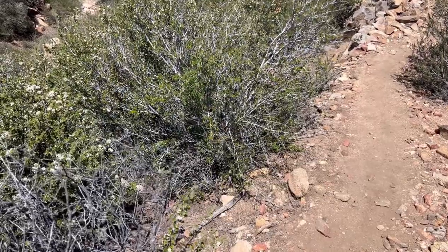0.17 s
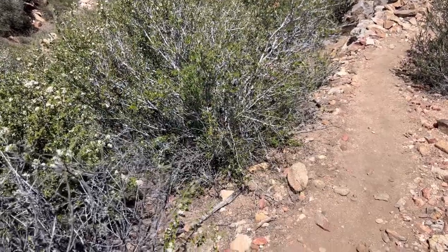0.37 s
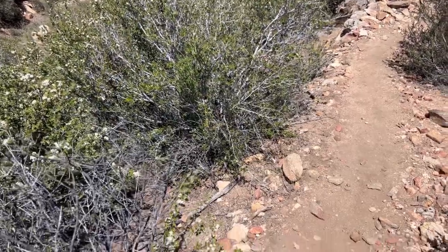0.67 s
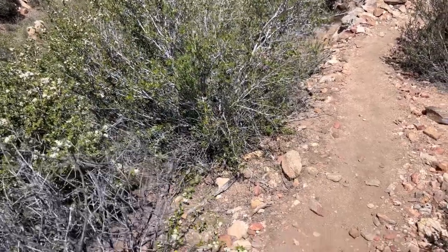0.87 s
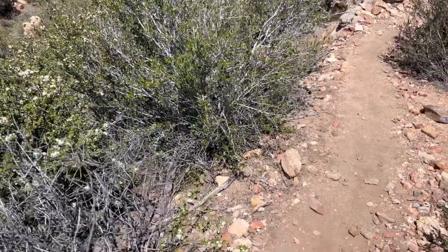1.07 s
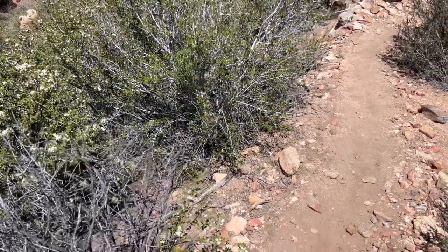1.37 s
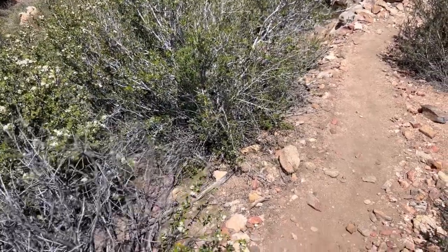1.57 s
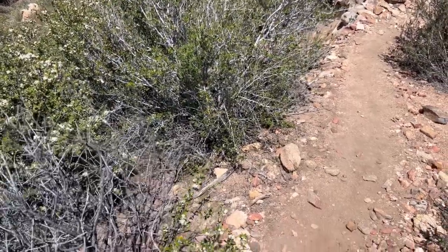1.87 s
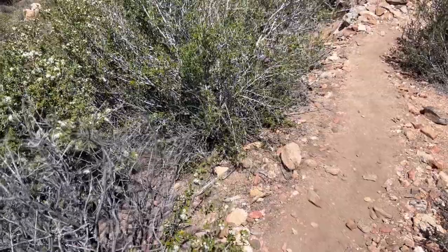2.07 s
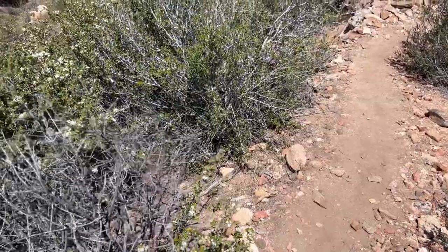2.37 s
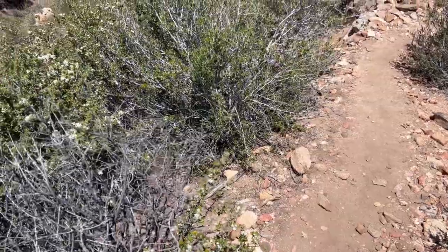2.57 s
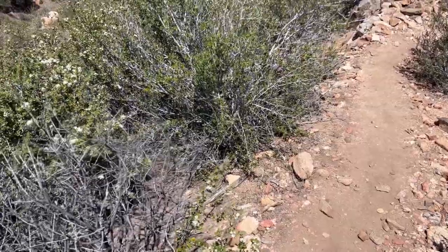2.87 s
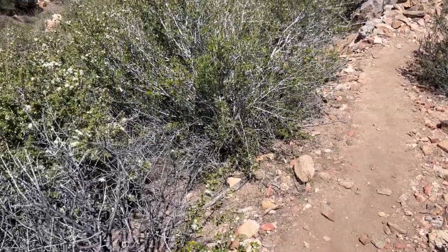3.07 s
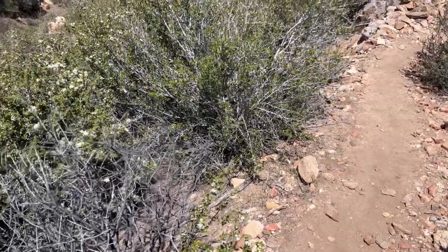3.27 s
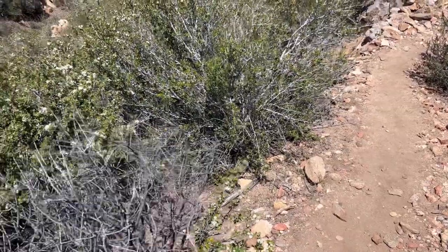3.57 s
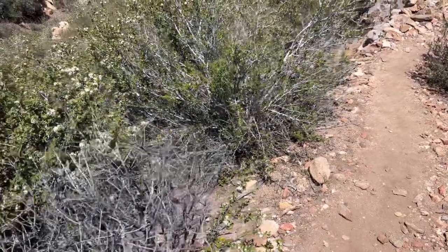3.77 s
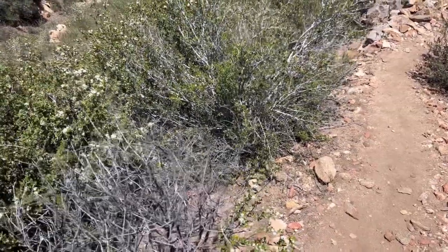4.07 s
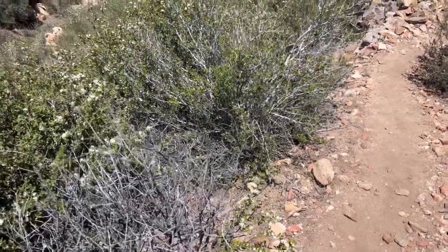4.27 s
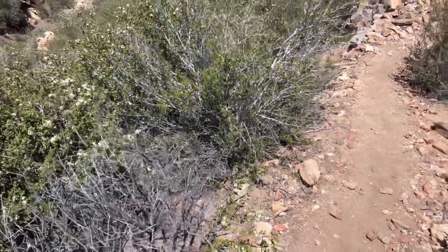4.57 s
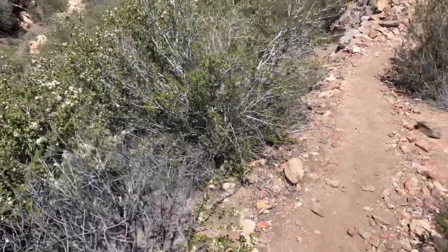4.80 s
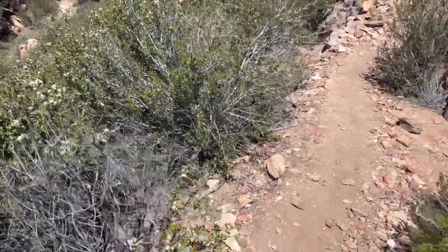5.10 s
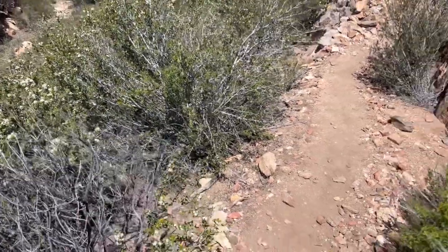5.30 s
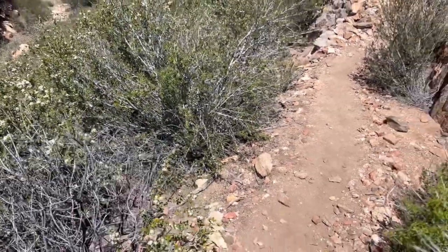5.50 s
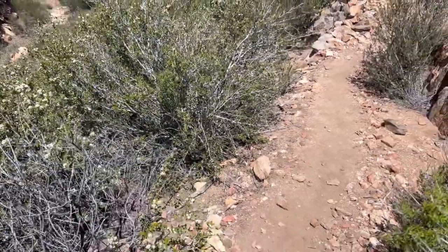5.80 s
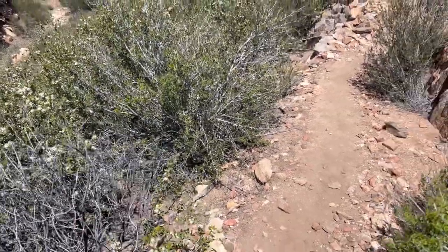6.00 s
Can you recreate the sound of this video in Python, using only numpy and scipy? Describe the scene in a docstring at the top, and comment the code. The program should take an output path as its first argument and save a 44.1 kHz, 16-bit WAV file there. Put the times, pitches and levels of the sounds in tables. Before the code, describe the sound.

Outdoors on an open dirt trail, a dense, dry, insect-like rattle runs from start to end without pause, its tone shifting subtly. Gusts buffet the handheld stereo microphone with soft deep bumps, mainly left; early on, two very loud low slaps overload it. Later come a sharp gravel click, light scraping crunches under a shoe, then mostly rattle and wind, with a last bit of grit near the end.

```python
"""Dirt trail: a rattlesnake buzzes inside a dry bush a few metres from a hand-held phone.
Rattle: random shell clicks, echoed by twigs, coloured at each port, with bands that drift in pitch.
Wind: noise rumble in gusts at the microphone ports, the left far more, with slaps that thump twice.
Grit underfoot: ringing ticks and swarms of crunches. Behind: coloured noise for leaves, slopes and hiss."""
import sys
import numpy as np
from scipy import signal
from scipy.fft import rfft, irfft, next_fast_len
from scipy.io import wavfile
from scipy.ndimage import uniform_filter1d

SR = 44100
rng = np.random.default_rng(int(sys.argv[2]) if len(sys.argv) > 2 else 0)


def bounce(signal):
    """Save signal as a 16-bit WAV file at the path given by the first command-line argument."""
    frames = np.transpose(np.atleast_2d(signal))
    limited = np.clip(frames, -1, 1)
    pcm = np.round(limited * 32767).astype(np.int16)
    wavfile.write(sys.argv[1], SR, pcm)


N = 270950
T = np.arange(N) / SR
FFT_SIZE = next_fast_len(N)
FFT_HZ = np.arange(FFT_SIZE // 2 + 1) * SR / FFT_SIZE


def undb(db):
    """Amplitude ratio of a level in dB."""
    return 10 ** (np.asarray(db) / 20)


def unit(x):
    """Scale to rms 1."""
    return x / np.sqrt(np.mean(x ** 2))


def spectrum(x):
    """Spectrum on the FFT_HZ grid."""
    return rfft(x, FFT_SIZE)


def waveform(bins):
    """Signal of N samples from a spectrum."""
    return irfft(bins, FFT_SIZE)[..., :N]


def colour(x, hz, db):
    """Filter by (f/Hz, gain/dB) points joined on a log-frequency axis; -90 dB outside them."""
    gain_db = np.interp(np.log(FFT_HZ + 1), np.log(hz), db, left=-90, right=-90)
    return waveform(spectrum(x) * undb(gain_db))


def curves(table):
    """Columns after t/s, interpolated to one value a sample."""
    s, *columns = np.transpose(table)
    return [np.interp(T, s, column) for column in columns]


def walk(rate_hz):
    """Random levels held 1 / rate_hz and slewed twice; spread near 1."""
    hold = int(SR / rate_hz)
    steps = np.repeat(rng.standard_normal(N // hold + 1), hold)
    return 1.3 * uniform_filter1d(uniform_filter1d(steps, hold), hold)[:N]


def pair(shared):
    """Two noises whose correlation is shared."""
    a, b = rng.standard_normal((2, N))
    return np.array([a, shared * a + np.sqrt(1 - shared ** 2) * b])


def moving_band(x, hz, width_hz):
    """Band of x about a moving centre: shift to 0 Hz, low-pass, shift back."""
    turn = np.exp(2j * np.pi * np.cumsum(hz) / SR)
    low_pass = signal.butter(2, width_hz / 2, fs=SR, output="sos")
    return 2 * (signal.sosfiltfilt(low_pass, x / turn) * turn).real


# the rattle: t/s, low shells level/dB, then middle, high and topmost shells gain/dB
RATTLE_LEVELS = [(0, -54, 5, -4.5, 0), (.35, -52, -1, 2, 0), (.85, -51, -2, -6.5, -4),
                 (1.1, -51.5, 1.5, -0.5, -1.5), (1.4, -51, 6.5, -5.5, -3.5), (1.7, -50, -1.5, -7, -3.5),
                 (2.2, -51.5, 1.5, -1, -1.5), (2.8, -51.5, 0.5, -3, 1), (3.3, -53, 4.5, 0.5, 2.5),
                 (3.7, -53.5, 2, 0.5, 3), (4.2, -52, -1, -1, 0.5), (4.6, -52, -5, 0, 1.5),
                 (4.9, -51.5, -1, -5.5, -6), (5.2, -50.5, 3, -2.5, -4.5), (5.55, -51, 6.5, 0.5, -9),
                 (5.82, -51, -1, -1.5, -4), (5.95, -50.5, 6, -6, -9), (6.14, -51, 6.5, -2, -4)]
# colour of the buzz at each port, with an abrupt rise at 8 kHz on the right from the phone's processing:
# f/Hz, left/dB, right/dB, likeness of the ports (-1..1)
PORT_COLOUR = [(1800, -17, -20, .6), (2650, -16, -18, .5), (3000, -10, -15, -.4), (3550, -12.5, -12, .3),
               (3800, -6, -8, .85), (4350, -3, -12, .4), (4750, 0, -11, -.1), (6100, -4.5, -7, .3),
               (6900, -14, -15, .1), (7950, -20, -18, 0), (8020, -20, -7, 0), (8400, -22, -8.5, -.2),
               (9200, -19, -18, -.6), (10200, -25, -24, -.8), (11100, -44, -44, -.5)]
# shell groups, high then topmost: centre f/Hz, Gaussian width/Hz
GROUP_BANDS = [(5750, 800), (7300, 660)]
# drifting ring of the middle shells: t/s, f/Hz
MIDDLE_PITCH = [(0, 4450), (.4, 4550), (1, 4850), (1.2, 4800), (1.3, 4250), (1.5, 4300), (1.6, 4850),
                (2.15, 4550), (2.5, 4650), (3, 4450), (3.4, 4650), (4, 4900), (4.5, 4700), (4.9, 4850),
                (5.3, 4880), (5.8, 4900), (5.88, 4680), (6.14, 4700)]
# drifting ring of the high shells: t/s, f/Hz, band gain/dB
HIGH_PITCH = [(0, 5640, 1), (.4, 5600, 4), (.9, 5760, 4), (1.25, 5600, 4.5), (1.6, 5500, 9.5),
              (1.9, 5500, -1), (2.5, 5600, 1.5), (3.1, 6200, -1), (4, 5800, -0.5), (4.9, 5700, 0),
              (5.15, 5700, 6), (5.6, 6060, 6.5), (5.85, 5900, 2), (6, 5700, 6), (6.14, 5570, 2)]
MIDDLE_WIDTH_HZ, HIGH_WIDTH_HZ = 180, 300
SHIMMER_DB, SHIMMER_HZ = .5, 12
PAN_DB, PAN_SWAY_DB, PAN_SWAY_HZ = -1.5, -1.4, 3  # left minus right
TWIG_DB, OWN_KNOCKS_DB = -14, -3  # echo mix gain; right port's own knocks under its echoes


def rattle():
    """Shell clicks and faint bush echoes reach both ports; the right also hears echoes and knocks of its own."""
    level_db, middle_db, *group_db = curves(RATTLE_LEVELS)
    pan_db = PAN_DB + PAN_SWAY_DB * walk(PAN_SWAY_HZ)
    hz, left_db, right_db, likeness = np.transpose(PORT_COLOUR)
    like = np.interp(FFT_HZ, hz, likeness)

    knocks = clicks()
    shared = spectrum(unit(knocks + undb(TWIG_DB) * twigs(knocks)))
    own_echoes = unit(twigs(knocks))
    own = spectrum(unit(own_echoes + undb(OWN_KNOCKS_DB) * clicks()))
    left = colour(waveform(shared), hz, left_db)
    right = colour(waveform(like * shared + np.sqrt(1 - like ** 2) * own), hz, right_db)
    ports = spectrum(np.array([left, right]))

    # shell groups swell and fade as the tail turns, each with its own shimmer
    shares = [np.exp(-.5 * ((FFT_HZ - centre_hz) / width_hz) ** 2) for centre_hz, width_hz in GROUP_BANDS]
    groups = [waveform(ports * share) for share in [1 - sum(shares)] + shares]
    buzz = 0
    for group, gain_db in zip(groups, [0] + group_db):
        buzz = buzz + group * undb(gain_db + SHIMMER_DB * walk(SHIMMER_HZ))

    middle_hz, = curves(MIDDLE_PITCH)
    buzz = buzz + (undb(middle_db) - 1) * moving_band(buzz, middle_hz, MIDDLE_WIDTH_HZ)
    high_hz, high_db = curves(HIGH_PITCH)
    buzz = buzz + (undb(high_db) - 1) * moving_band(buzz, high_hz, HIGH_WIDTH_HZ)
    low_rms = np.std(groups[0].mean(axis=0))
    return undb(level_db) * buzz / low_rms * undb(np.array([pan_db, -pan_db]) / 2)


SHAKE_HZ, SHAKE_DEPTH = 58.3, .14
CLICKS_PER_S, CLICK_SCATTER_DB = 10000, 1.68  # mean rate; mean of the exponential scatter


def clicks():
    """Loose shells knock at random, more often at the turns of the tail."""
    phase = 2 * np.pi * np.cumsum(SHAKE_HZ * (1 + .02 * walk(3))) / SR
    shake = .87 * np.sin(phase) + .54 * np.sin(2 * phase)
    hit = rng.random(N) < CLICKS_PER_S / SR * (1 + SHAKE_DEPTH * shake)
    sign = rng.choice([-1., 1.], N)
    return unit(hit * sign * undb(CLICK_SCATTER_DB * rng.exponential(size=N)))


# hand drift stretches all echo paths together: t/s, length as a share
ECHO_REACH = [(0, 1.1), (.8, 1.08), (1.7, 1.13), (2, 1.13), (2.5, 1.07), (3, 1.08), (3.5, 1.03),
              (4.4, 1.02), (5.3, .93), (5.8, .93), (5.9, .97), (6.14, .96)]
TWIG_START_S, TWIG_SPAN_S = .001001, .0045  # lags at reach 1
SWAY_S, SWAY_HZ, TWIG_FLICKER_DB = .00006, 3, 4


def twigs(x, count=7):
    """Short echoes off twigs and ground; lags drift as the hand sways, so fine strands wander in the buzz."""
    fine = signal.resample_poly(x, 4, 1)  # quarter-sample lags
    reach, = curves(ECHO_REACH)
    echoes = 0
    for k, u in enumerate(rng.random(count)):
        lag_s = (TWIG_START_S + TWIG_SPAN_S * (k + u) / count) * reach + SWAY_S * walk(SWAY_HZ)
        index = np.clip(((T - lag_s) * 4 * SR).astype(int), 0, 4 * N - 1)
        echoes = echoes + undb(TWIG_FLICKER_DB * walk(SWAY_HZ)) * fine[index]
    return echoes


# steady wind between gusts, before port gain: t/s, low rumble level/dB, harsh rumble level/dB
STEADY_WIND = [(0.0, -30.5, -47.5), (0.53, -35, -45), (.65, -28, -36.5), (0.85, -25, -44),
               (1.05, -26.5, -45), (1.3, -29, -45), (2.43, -33, -47.5), (2.97, -32, -47),
               (3.57, -33.5, -45.5), (4.6, -33.5, -50), (5.64, -30.5, -48), (6.14, -32.5, -52)]
# gust swells of the rumble, before port gain: t/s, low level/dB, harsh level/dB, Gaussian half length/s
GUST_SWELLS = [(0.215, -21.5, -51, 0.0083), (0.329, -28, -69, 0.012), (0.503, -27.5, -46.5, 0.037),
               (1.492, -22, -49, 0.0079), (1.567, -20, -66, 0.0057), (1.734, -18.5, -51, 0.0081),
               (1.884, -18.5, -37, 0.021), (2.129, -19.5, -38, 0.0059), (2.157, -42.5, -48, 0.018),
               (2.38, -27.5, -42, 0.012), (2.562, -20, -40, 0.0058), (2.85, -29.5, -39, 0.024),
               (3.095, -21.5, -47, 0.0089), (3.19, -27, -44.5, 0.014), (3.586, -34.5, -50.5, 0.028),
               (3.728, -23, -34.5, 0.011), (3.812, -29.5, -47, 0.015), (4.115, -25.5, -56, 0.0069),
               (4.235, -22.5, -43, 0.01), (4.428, -27.5, -50, 0.021), (4.524, -23.5, -49, 0.011),
               (4.615, -25, -44.5, 0.035), (4.805, -23, -46, 0.0065), (4.943, -27, -43, 0.016),
               (5.12, -28.5, -47, 0.02), (5.348, -26.5, -59, 0.026), (5.5, -30, -41.5, 0.022),
               (5.633, -19.5, -40, 0.0096), (5.722, -28, -45.5, 0.021), (5.845, -25.5, -37, 0.016),
               (5.919, -21.5, -33.5, 0.0093), (6.02, -29.5, -51, 0.017), (6.081, -29.2, -50, 0.0094)]
# low rumble colour: f/Hz, gain/dB
LOW_COLOUR = [(20, -45), (35, -16.5), (55, 2.5), (80, 2), (110, -4), (150, -18.5), (200, -51.5)]
# harsh rumble colour: f/Hz, gain/dB
HARSH_COLOUR = [(90, -47), (140, 4), (200, -2.5), (260, -12), (320, -27.5), (450, -47.5), (700, -51)]
# pressure wobbles of port slaps: t/s, peak level at the left port/dB, f/Hz, Gaussian length/s
SLAPS = [(0.8, -37, 304, 0.0039), (0.9516, -4.5, 97.6, 0.011), (0.9519, -4, 166.5, 0.0042),
         (0.938, -9, 87.5, 0.0048), (0.993, -15, 65, 0.013), (1.142, -18, 109, 0.0071),
         (1.157, -15.5, 235, 0.0043), (1.169, -4.5, 123.5, 0.0037), (1.178, -13, 99, 0.0055),
         (1.187, -6.5, 190, 0.003), (1.194, -4.5, 80.8, 0.018), (1.211, -9.5, 160, 0.0043),
         (1.532, -38, 270, 0.0022), (1.892, -27, 211, 0.006), (4.346, -26, 206, 0.0063),
         (5.312, -31.5, 236, 0.0035), (5.893, -37, 273, 0.0026)]
# rough edge of a slap: f/Hz, gain/dB
SPRAY_COLOUR = [(250, -6), (350, 0), (480, -4), (600, -12), (750, -30)]
# wind at the right port against the left: f/Hz, gain/dB, phase lag/rad
RIGHT_SHELTER = [(50, -8.5, .75), (80, -9.5, .6), (130, -11.5, .25), (200, -11.5, .1), (280, -6, -.1),
                 (500, -4, -.1), (900, -4, 0)]
LULL_DB, LULL_HZ, HARSH_FLUTTER_DB, FLUTTER_HZ = 5, 14, 3.5, 18
STIR_DB, SPRAY_DB = -20, -47  # under the slap
WIND_SHARED, WIND_PORT_DB = .98, 4


def wind():
    """Eddies over the ports: low and harsh rumble swelling in gusts, plus the slaps of single gusts."""
    low_db, harsh_db = curves(STEADY_WIND)
    low_gain = undb(low_db + LULL_DB * np.minimum(walk(LULL_HZ), .6))
    harsh_gain = undb(harsh_db + HARSH_FLUTTER_DB * walk(FLUTTER_HZ))
    for s, gust_low_db, gust_harsh_db, half_s in GUST_SWELLS:
        near = slice(max(int((s - .2) * SR), 0), int((s + .2) * SR))
        swell = np.exp(-.5 * ((T[near] - s) / half_s) ** 2)
        low_gain[near] += (undb(gust_low_db) - low_gain[near]) * swell
        harsh_gain[near] += (undb(gust_harsh_db) - harsh_gain[near]) * swell
    low_eddies = even_eddies(LOW_COLOUR, .05)
    harsh_eddies = even_eddies(HARSH_COLOUR, .04)

    slaps, stir = 0, 0
    for s, peak_db, hz, length_s in SLAPS:
        push = undb(peak_db - WIND_PORT_DB) * np.exp(-.5 * ((T - s) / length_s) ** 2)
        slaps = slaps - push * np.cos(2 * np.pi * hz * (T - s))
        stir = stir + push
    # a strong slap sweeps the small eddies away while it lasts
    calm = 1 / (1 + 12 * uniform_filter1d(np.abs(slaps), 1024))
    low = calm * low_gain * low_eddies
    harsh = slaps + (calm * harsh_gain + undb(STIR_DB) * stir) * harsh_eddies
    spray = unit(colour(rng.standard_normal(N), *np.transpose(SPRAY_COLOUR)))
    harsh = harsh + undb(SPRAY_DB) * stir * spray
    left, right = (low + harsh) * undb(WIND_PORT_DB)

    # sheltered right port; the deepest swings reach it late
    hz, db, late_rad = np.transpose(RIGHT_SHELTER)
    shelter = undb(np.interp(FFT_HZ, hz, db)) * np.exp(-1j * np.interp(FFT_HZ, hz, late_rad))
    return np.array([left, waveform(spectrum(right) * shelter)])


def even_eddies(table, span_s):
    """Coloured eddy noise at the two ports, levelled by its running power so that the gusts set the swell."""
    x = colour(pair(WIND_SHARED), *np.transpose(table))
    size = int(span_s * SR)
    power = uniform_filter1d(uniform_filter1d(x ** 2, size), size)
    return x / np.sqrt(power + .014 * np.mean(x ** 2))


# grit ticks, before mode and port gains: t/s, middle level/dB, dull level/dB, bright level/dB
GRIT_TICKS = [(0.183, -41.5, -60, -56), (0.45, -41.5, -58, -53), (0.491, -45, -49, -56),
              (0.817, -42, -62, -49), (1.038, -43.5, -64, -33.5), (1.056, -47, -68, -35),
              (1.258, -45.5, -56, -60), (1.339, -47, -57, -57), (2.189, -39.5, -59, -54),
              (2.515, -42, -52, -43), (2.531, -39, -59, -43), (2.553, -28, -43.5, -27),
              (2.557, -36, -47, -43), (2.605, -43, -51, -54), (2.764, -38.5, -49, -38),
              (3.103, -32, -50, -55), (3.175, -29, -48, -56), (3.226, -40.5, -62.5, -31.5),
              (3.29, -50, -45, -56), (3.449, -42.5, -51, -57), (3.612, -44.5, -52, -57),
              (3.699, -41, -60, -48), (3.706, -44, -45, -57), (3.792, -37, -55, -46),
              (5.801, -36.5, -43.5, -44), (5.819, -48, -49, -58), (5.851, -48, -53, -58),
              (5.876, -48, -54, -58), (6.03, -45, -69, -56), (6.129, -36.5, -47, -55)]
# grit modes: nominal f/Hz (scattered per tick), gain/dB, t60/s
GRIT_MODES = [(491, 10.5, 0.019), (662, 6.5, 0.032), (935, 0.5, 0.021), (1152, -0.5, 0.015),
              (1320, -0.5, 0.016), (1850, -6, 0.0094), (2280, -4.5, 0.011), (2880, -8, 0.0082)]
# crunches under a shifting sole: start t/s, length/s, level before port gain/dB
SOLE_CRUNCHES = [(0.405, 0.074, -60), (2.504, 0.061, -47), (2.554, 0.031, -47), (3.037, 0.24, -53),
                 (3.663, 0.11, -52.5), (3.75, 0.085, -49.5), (5.799, 0.02, -42.5)]
# faint stray ticks until the feet rest: middle, dull, bright level; scatter either way
STRAY_DB, STRAY_SCATTER_DB, FEET_REST_S = (-54, -62, -60), 3, 4.0


def grit(count=40):
    """Each tick rings dull, middle and bright modes by its own blow; a crunch is a swarm of small ones."""
    ringing, t = np.zeros(N + 2048), T[:2048]
    ticks = list(GRIT_TICKS)
    for u in rng.random((count, 4)):
        ticks.append((FEET_REST_S * u[0], *np.add(STRAY_DB, STRAY_SCATTER_DB * (2 * u[1:] - 1))))
    attack = 1 - np.exp(-t / .00051)
    for s, middle_db, dull_db, bright_db in ticks:
        ring = 0
        for (hz, mode_db, t60_s), u in zip(GRIT_MODES, rng.random(len(GRIT_MODES))):
            blow_db = dull_db if hz < 800 else middle_db if hz < 1600 else bright_db
            decay = np.exp(-np.log(1000) * t / t60_s)
            ring = ring + undb(mode_db + blow_db) * decay * np.sin(2 * np.pi * hz * (.869 + .26 * u) * t)
        start = int(s * SR)
        ringing[start:start + 2048] += ring * attack

    hits = rng.random(N) < 6000 / SR  # mean 6000 grains/s
    swarm = hits * rng.standard_normal(N) * undb(rng.exponential(size=N))
    swarm = unit(colour(swarm, [300, 600, 1400, 2500, 3500], [1, -.5, .5, -9, -14]))
    press = 0
    for s, length_s, db in SOLE_CRUNCHES:
        press = press + undb(db) * np.sin(np.pi * np.clip((T - s) / length_s, 0, 1))
    return (ringing[:N] + swarm * press) * undb([[-2], [1.2]])  # left, right


# leaves and far slopes: f/Hz, gain/dB
AIR_COLOUR = [(200, -9), (400, 2.5), (800, -1), (1150, -7), (1500, 1), (2200, -6), (3000, -13.5),
              (4000, -35)]
# phone hiss: f/Hz, gain/dB
HISS_COLOUR = [(9000, -36), (11200, -14), (12200, 5.5), (13400, -29), (14500, -1.5), (15500, 14.5),
               (17000, -1)]
AIR_DB, AIR_SHARED, AIR_DRIFT_DB, AIR_DRIFT_HZ = -58.5, .73, 2, 3.91
HISS_DB, HISS_SHARED, HISS_DRIFT_DB, HISS_DRIFT_HZ = -71, .82, 1.5, 24


def air():
    """Leaves and far slopes murmur as broad noise; the phone's hiss sits at the top, alike on both sides."""
    far = unit(colour(pair(AIR_SHARED), *np.transpose(AIR_COLOUR)))
    side_db = np.array([[1.5], [-1.5]])
    far = far * undb(AIR_DB + AIR_DRIFT_DB * walk(AIR_DRIFT_HZ) + side_db)
    hiss = unit(colour(pair(HISS_SHARED), *np.transpose(HISS_COLOUR)))
    return far + hiss * undb(HISS_DB + HISS_DRIFT_DB * walk(HISS_DRIFT_HZ))


def scene():
    """Sum of all sources at the two ports."""
    return rattle() + wind() + grit() + air()


TOP_HZ = 15730


def record(dry):
    """Clip at full scale, which the strongest slaps reach; elliptic low-pass cuts the top."""
    low_pass = signal.ellip(14, .3, 60, TOP_HZ, fs=SR, output="sos")
    return signal.sosfilt(low_pass, np.clip(dry, -1, 1))


dry = scene()
out = record(dry)
bounce(out)
```